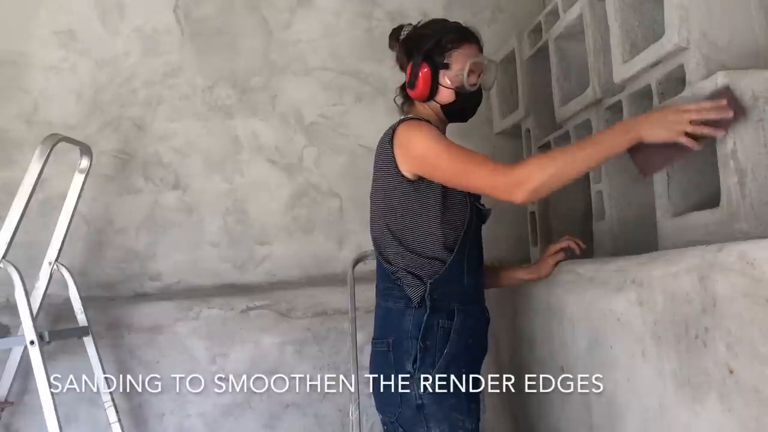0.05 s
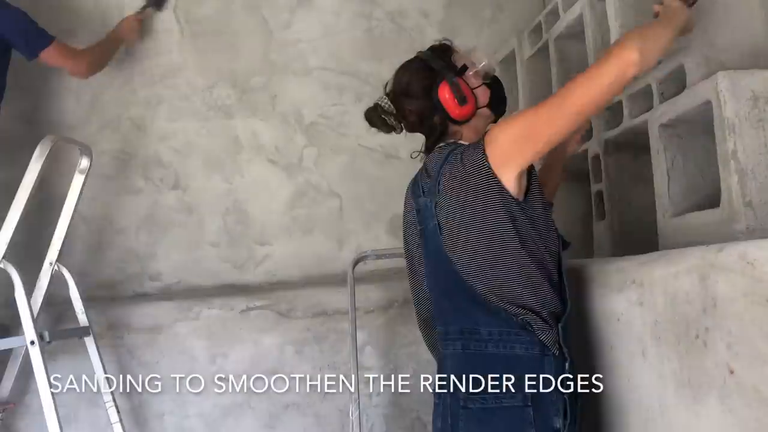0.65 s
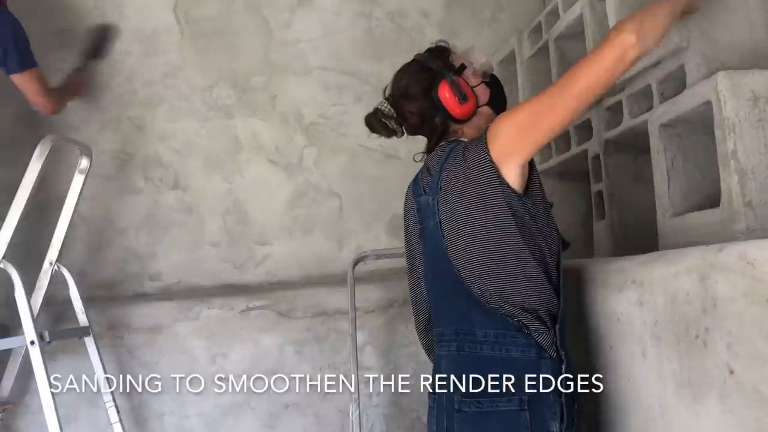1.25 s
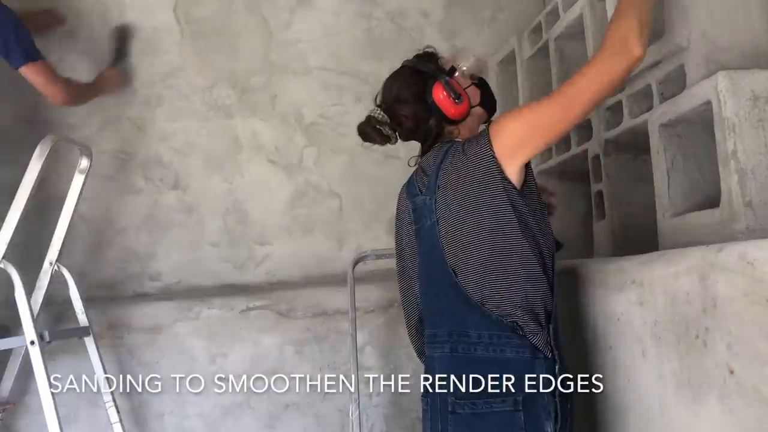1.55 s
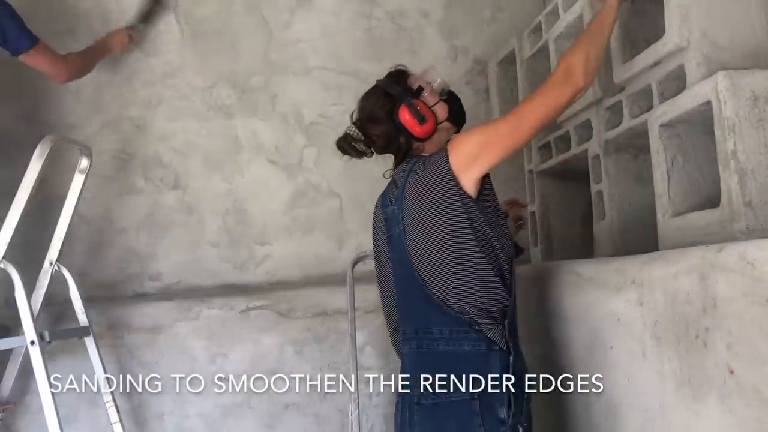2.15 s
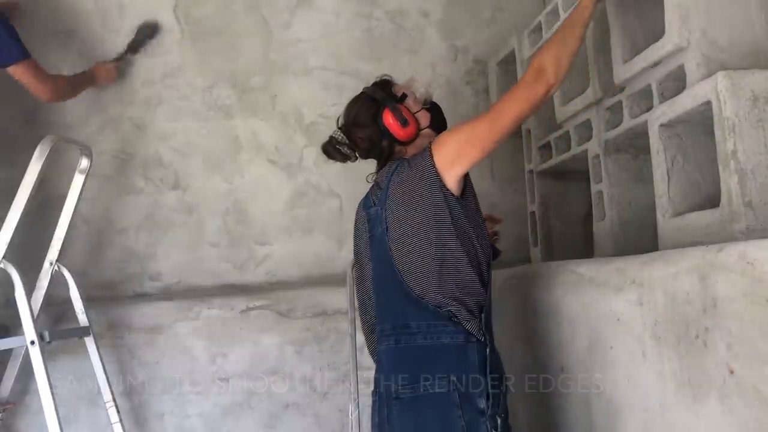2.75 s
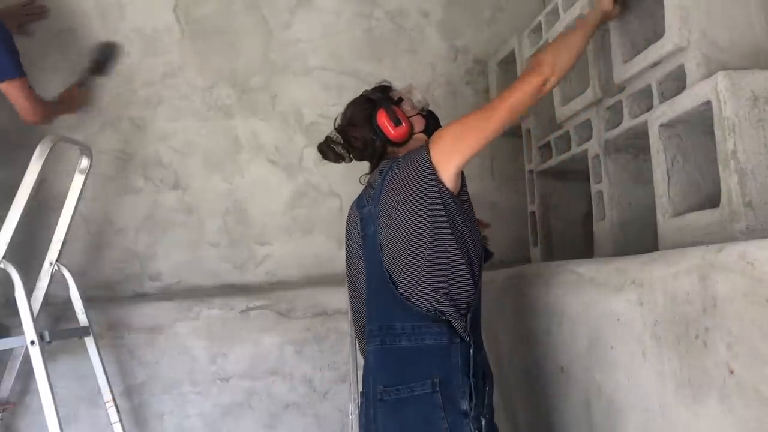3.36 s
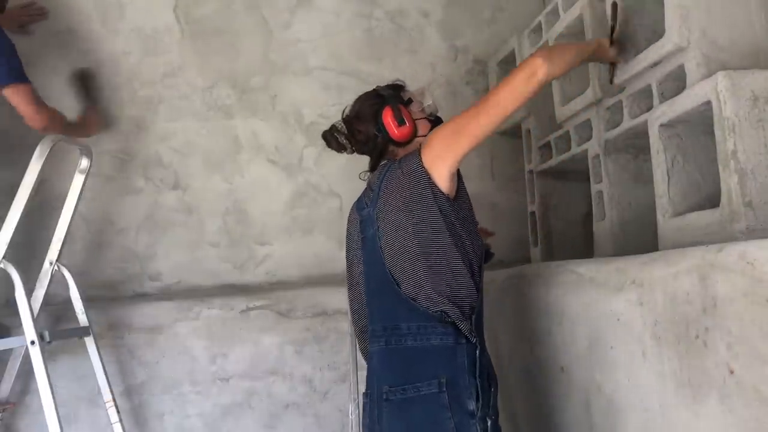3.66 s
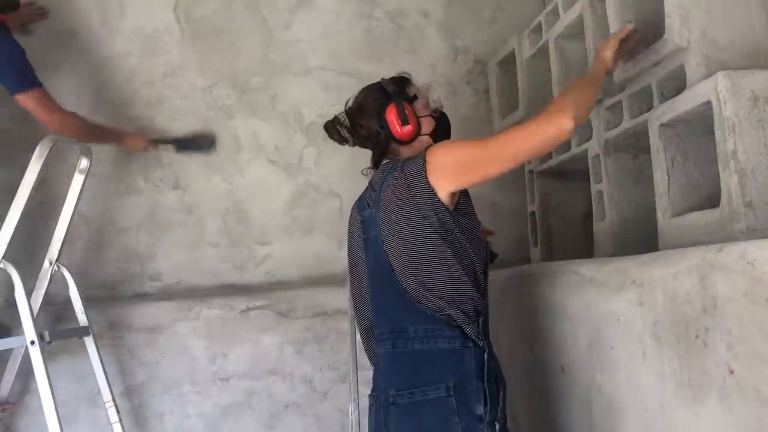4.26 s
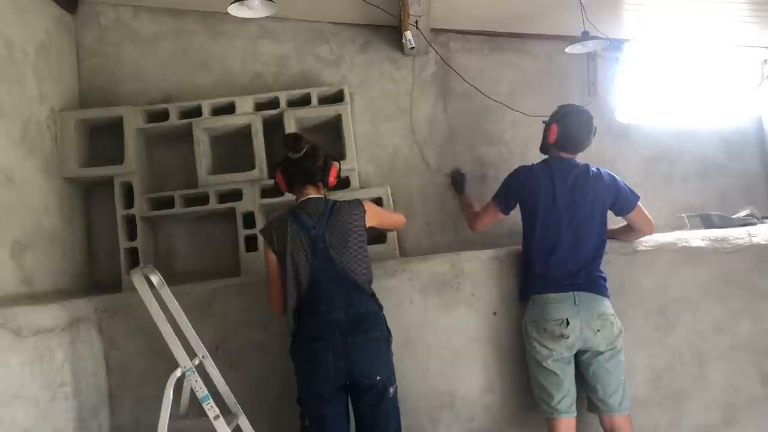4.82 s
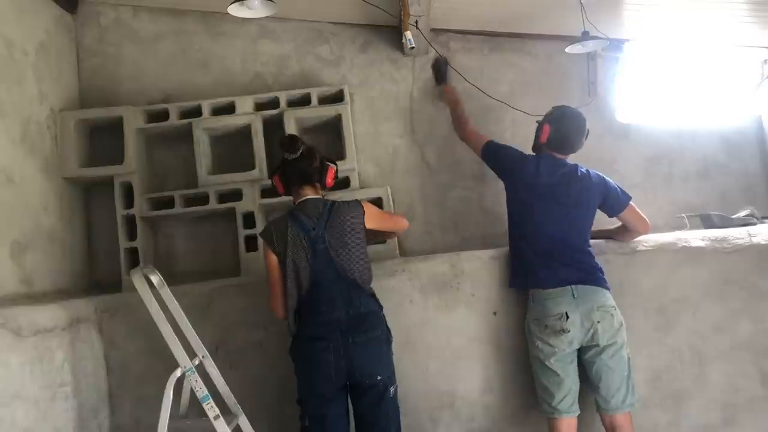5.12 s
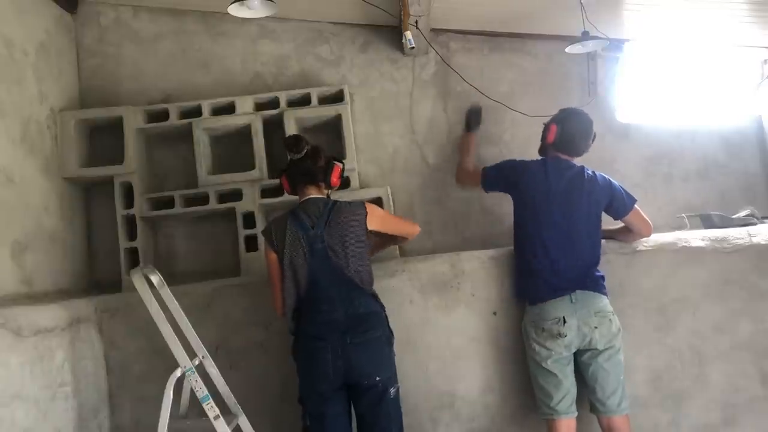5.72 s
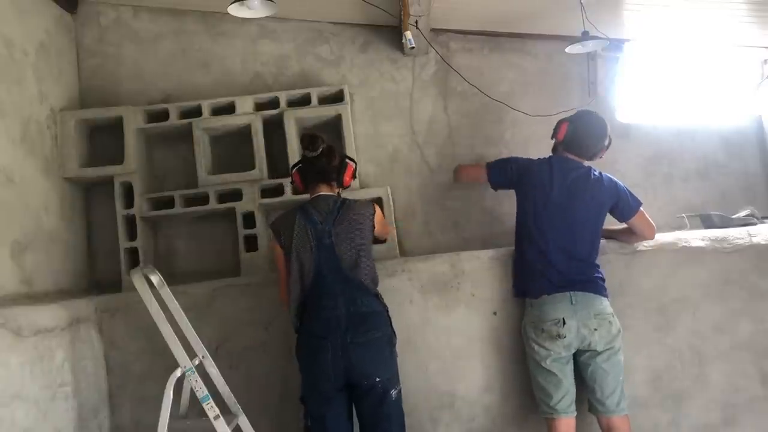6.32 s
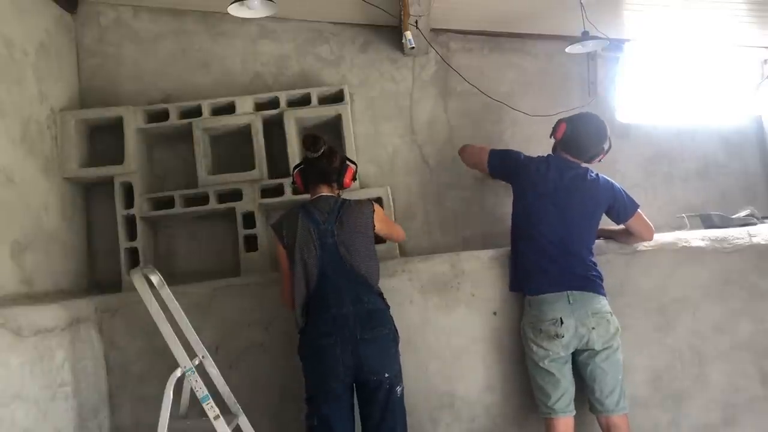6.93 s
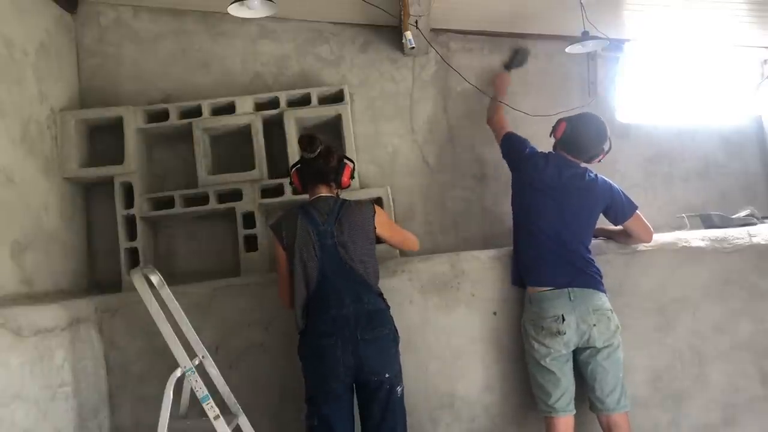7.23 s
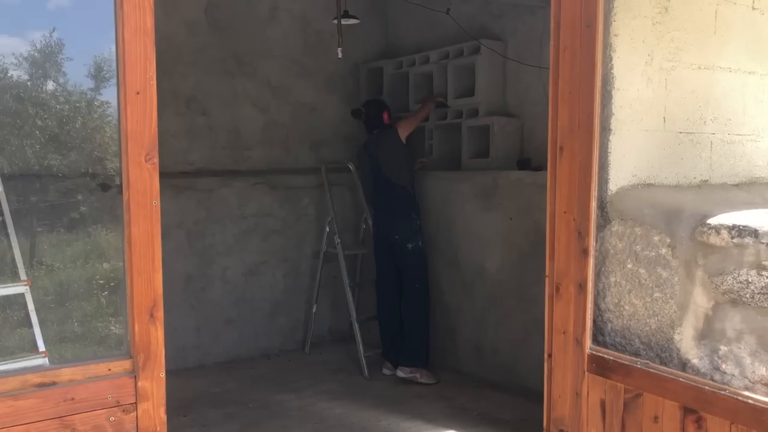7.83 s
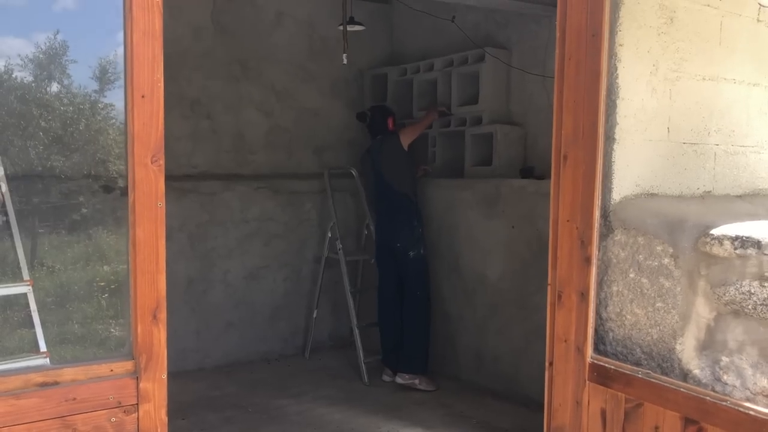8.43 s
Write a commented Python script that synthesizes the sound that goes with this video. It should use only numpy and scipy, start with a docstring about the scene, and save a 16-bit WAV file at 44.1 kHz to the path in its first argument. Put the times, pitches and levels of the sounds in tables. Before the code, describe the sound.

A sanding block rasps back and forth over hollow concrete blocks and cement, with short pauses and a slight room echo.

```python
"""Hand sanding of hollow concrete blocks and fresh render in a bare cement room. Each stroke speeds up and
slows down; grit catches on the rough face, rings the sanding block and makes the hollow wall drone. Open
cavities sing short notes, and the sanding block taps the wall. The echoing work is heard from one spot after
another over still air, the scene changing abruptly each time: at arm's length, from behind two workers, then
louder from the doorway."""
import sys
import numpy as np
from scipy import signal
from scipy.fft import rfft, irfft, next_fast_len
from scipy.io import wavfile
from scipy.ndimage import uniform_filter1d, map_coordinates

SR = 44100
rng = np.random.default_rng(int(sys.argv[2]) if len(sys.argv) > 2 else 0)


def transcribe(signal):
    """Save signal, clipped to [-1, 1], as a 16-bit WAV file at the path in sys.argv[1]."""
    frames = np.atleast_2d(signal).T
    limited = np.clip(frames, -1, 1)
    pcm = np.round(limited * 32767).astype(np.int16)
    wavfile.write(sys.argv[1], SR, pcm)


N = 378378


def amp(db):
    """Turn decibels into a gain."""
    return 10 ** (np.asarray(db) / 20)


def unit(x):
    """Scale a sound to an average (rms) level of 1."""
    return x / np.sqrt(np.mean(x ** 2) + 1e-20)


def along(points, hz):
    """Read between (frequency, value) points on a log frequency axis."""
    f, values = np.transpose(points)
    return np.interp(np.log(hz + 1), np.log(f + 1), values)


def wobble(rate):
    """A smooth curve through `rate` random values a second."""
    return map_coordinates(rng.standard_normal(int(N * rate / SR) + 4), [np.arange(N) * rate / SR])


def filtered(x, response):
    """Multiply each frequency in x by response(frequency)."""
    size = next_fast_len(len(x) + SR // 2)
    return irfft(rfft(x, size) * response(np.fft.rfftfreq(size, 1 / SR)), size)[:len(x)]


def resonances(modes, f):
    """How something that rings answers at f; modes are (pitch [Hz], width [Hz], level [dB])."""
    return sum((-1) ** k * amp(db) * 1j * f * width / (hz * hz - f * f + 1j * f * width)
               for k, (hz, width, db) in enumerate(modes))


def grit(grains_per_s, bump_db, spread_db=2, dust_db=1):
    """Sand grains of all sizes snap off over a hiss of dust, in clumps where the wall is bumpy."""
    grains = (rng.random(N) < grains_per_s / SR) * rng.standard_normal(N)
    grains *= amp(spread_db * np.minimum(rng.exponential(size=N), 4))
    bumps = amp(bump_db * (wobble(45) + wobble(260)))
    dust = amp(dust_db) * rng.standard_normal(N)
    return unit(bumps * (unit(grains) + dust))


# Tone colour of the scrape from each listening spot: (frequency [Hz], level [dB])
CLOSE = [(40, -50), (150, -51), (380, -20), (560, -8.5), (850, -4.5), (1000, -6), (1220, -4), (1550, -4),
         (2000, -0.5), (3300, 1), (5500, 1), (8000, 0), (12000, -5), (15700, -6.5)]
BEHIND = [(40, -48), (120, -18), (200, -10), (350, -28), (480, -5), (790, -2.5), (950, -1.5), (1350, -1),
          (3200, 2.5), (3800, 2), (6400, 1), (8000, -0.5), (12000, -5), (15700, -6)]
DOORWAY = [(150, -26), (470, -8), (660, -2), (780, -5.5), (1000, -1.5), (1350, -4.5), (1850, 6), (2050, 8),
           (3400, 6.5), (4800, 6), (7000, 3.5), (10000, -1), (15700, -5.5)]


def scrape(sand, colour, hiss_db, rasp_db, rings, patchy_db=1.42):
    """Grit rings the sanding block; light strokes hiss, while edges and lumps rasp."""
    coloured = filtered(sand, lambda f: amp(along(colour, f)))
    hz, age, spectrum = signal.stft(coloured, SR, nperseg=512)
    f = hz[:, None]
    for centre, width, db in rings:
        spectrum = spectrum * (1 + (amp(db) - 1) * resonances([(centre, width, 0)], f))
    level = np.std(signal.istft(spectrum, nperseg=512)[1])
    hiss_now_db = np.interp(age, np.arange(len(sand)) / SR, hiss_db)
    treble_db = hiss_now_db * along([(2800, 0.077), (5000, 0.56), (10000, 1.13), (15500, 1.2)], f)
    low_db = rasp_db * along([(1300, 0.93), (2200, 0.011)], f)
    # the colour shifts from patch to patch of wall
    patches = uniform_filter1d(rng.standard_normal(spectrum.shape), size=4, axis=0)
    patches = unit(uniform_filter1d(patches, size=5, axis=1))
    spectrum = spectrum * amp(treble_db + low_db + patchy_db * patches) / level
    return signal.istft(spectrum, nperseg=512)[1][:len(sand)]


# Ringing of the air inside the hollow wall: (pitch [Hz], width [Hz], level [dB])
CELLS = [(70, 20, -27), (171, 22, -8.5), (280.5, 34, 0), (416, 74, -5)]
DEEP_CELLS = [(59.4, 41, -8), (237, 38, 0.5), (352, 60, -6.5)]


def wall_drone(judder, cavities, low_cut_hz=33):
    """The juddering sanding block shakes the air in the hollow wall."""
    return unit(filtered(judder, lambda f: resonances(cavities, f) * f ** 4 / (f ** 4 + low_cut_hz ** 4)))


# One pass of the hand per row: (start [s], speeding up [s], slowing down [s], scrape level [dB],
# extra hiss [dB], extra rasp [dB], drone level [dB], block pitch [Hz], extra ring from a loose grip [dB])
STROKES = [(-0.045, 0.028, .11, -35.5, -2, 4.5, -54, 2390, 0),
           (0.077, 0.059, .16, -32, -1.5, 1, -57, 2490, 2),
           (0.269, .085, .15, -37, -2.5, 4, -60, 2400, 1.5),
           (0.64, 0.044, .09, -56.5, 4, 10.5, -65, 2350, -3),
           (0.715, .02, 0.073, -47, 4.5, -6, -77, 2400, -5),
           (0.762, 0.017, 0.13, -37, 6, -6, -69, 2400, -1.5),
           (0.77, .12, 0.095, -32.5, 4, 3, -55.5, 2350, 0), (0.972, 0.073, .18, -31, 1.5, 2, -56, 2420, -2),
           (1.194, .13, 0.17, -31, 1.5, 3.5, -58, 2350, -1.5),
           (1.465, 0.13, 0.26, -57, 3, 8, -65.5, 2430, 0),
           (1.75, .045, 0.062, -40.5, 6, -8, -78, 2270, 0.5),
           (1.786, 0.096, 0.19, -34, -1, 1, -55, 2270, -1.5),
           (2.036, 0.13, .1, -31, -2.5, 1, -55, 2310, -2), (2.245, 0.14, .12, -34, 1.5, 0, -53.5, 2290, -1),
           (2.481, 0.074, 0.14, -34.5, -1, 1, -59, 2280, -1.5),
           (2.661, 0.12, 0.25, -35.5, 0, 2.5, -58, 2310, 1),
           (2.965, 0.16, 0.093, -36, 3.5, -1.5, -61, 2280, 0.5),
           (3.23, .1, .149, -35, 2.5, 2.5, -61.5, 2370, 0.5),
           (3.452, 0.12, .13, -36, 5, 0.5, -61.5, 2200, -2.5),
           (3.688, 0.047, 0.094, -38.5, -0.5, 2, -63, 2250, -0.5),
           (3.8, .1, 0.14, -39.5, 3, 3, -66, 2400, 1), (3.94, .095, 0.18, -29.5, 0, -6.5, -62.5, 2440, 0.5),
           (4.3, 0.15, .03, -63, 8, 1, -74, 2390, 0), (4.512, .11, .06, -35.5, 2.5, 3.5, -60, 2320, -1),
           (4.68, .088, 0.062, -30, -2.5, -1, -57, 2450, 2),
           (4.818, 0.057, 0.094, -34.5, 1, 1.5, -67, 2360, 1),
           (4.935, 0.046, 0.15, -35.5, 2, 0.5, -54.5, 2550, -0.5),
           (5.13, .1, 0.095, -54, -6, 12, -70, 2600, 4), (5.27, 0.023, .06, -38.5, -6, -8, -72, 2400, 6),
           (5.272, 0.086, 0.14, -36, 2, 3.5, -64, 2250, -1),
           (5.66, 0.096, 0.095, -32, 0.5, 2, -55.5, 2630, 2.5),
           (5.88, 0.072, 0.13, -59, -5, -3, -68.5, 2600, 7),
           (5.95, .16, 0.18, -70.5, 11, 14.5, -84, 2310, 0), (6.106, 0.12, .075, -70, 16, 2, -84, 2590, -2),
           (6.3, 0.066, 0.15, -55.5, 2, 9, -66.5, 2170, 0.5), (6.421, .13, .051, -62, 14, 3, -86, 2300, 3),
           (6.568, .028, 0.051, -39, -2, 5, -65, 2560, 1.5),
           (6.609, .068, 0.1, -33, -3, -1.5, -57, 2650, 1.5), (6.705, .04, 0.2, -38, 5, 2, -57, 2400, 0),
           (6.89, .11, .18, -59.5, 7, 6, -69, 2230, 2),
           (7.086, 0.033, 0.098, -50.5, 4, -0.5, -69, 2180, -0.5),
           (7.192, .22, 0.22, -64.5, 10.5, 6, -80, 2250, 2),
           (7.538, .12, 0.094, -61.5, 12, 20, -68, 2540, 10),
           (7.655, 0.011, 0.058, -41, -4, 11.5, -44.5, 2310, -6),
           (7.718, 0.029, 0.07, -27.5, 1, 4, -47, 2700, -1),
           (7.777, 0.061, 0.066, -24, -.5, 2, -44.5, 2600, 0),
           (7.892, 0.08, 0.105, -22.5, .5, 0, -43, 2400, 0),
           (8.044, 0.084, 0.12, -24.5, 1.5, 2, -44.5, 2510, 2),
           (8.214, 0.041, 0.052, -22, 3, -2, -55, 2590, 0),
           (8.252, 0.059, .065, -20.5, 0, 2.5, -41, 2270, 2.5),
           (8.365, 0.068, .09, -25.5, 2.5, 3.5, -45, 2480, 1),
           (8.497, 0.094, .08, -21.5, -1, 2, -40.5, 2180, -1)]


def sanding(t, span, sand, wall, colour, ring_db, width_hz, upper_hz, upper_db, upper_width_hz=380):
    """The hand speeds up and slows down on each stroke; its speed sets the scrape, hiss and drone."""
    slow_dull_db, bite_db = 3, 1.5  # less hiss as the hand slows, more where the stroke bites in
    scrape_power, drone_power = 1.28, 0.69  # how steeply each grows with speed
    out = np.zeros(len(t))
    for start, rise, fall, scrape_db, hiss_db, rasp_db, wall_db, ring_hz, loose_db in STROKES:
        if not span[0] <= start + (rise + fall) / 2 < span[1]:
            continue
        on = (t > start) & (t < start + rise + fall)
        travel = np.interp(t[on], [start, start + rise, start + rise + fall], [0, .5, 1])
        speed = np.abs(np.sin(np.pi * travel))
        bright_db = hiss_db - slow_dull_db * (1 - speed) + bite_db * (1 - 2 * travel)
        rings = [(ring_hz, width_hz, ring_db + loose_db), (upper_hz, upper_width_hz, upper_db)]
        scraping = scrape(sand[on], colour, bright_db, rasp_db, rings)
        out[on] += amp(scrape_db) * speed ** scrape_power * scraping
        out[on] += amp(wall_db) * speed ** drone_power * wall[on]
    return out


# How long the room rings: (frequency [Hz], time to fade by 60 dB [s])
ECHO_TIMES = [(200, 1), (1000, 0.64), (2500, 0.62), (5000, 0.55), (10000, 0.4), (16000, 0.3)]


def room_echo(x, echo_db, treble_db=-5.0, patterns=16, renew_s=.045):
    """Bare walls echo, the treble dying first; the pattern changes as the hand moves along the wall."""
    hz, age, noise = signal.stft(rng.standard_normal((patterns, SR // 2)), SR, nperseg=256)
    decay = amp(-60 * age / along(ECHO_TIMES, hz)[:, None])
    decay /= np.linalg.norm(decay, axis=1, keepdims=True)
    decay *= amp(along([(2500, 0), (10000, treble_db)], hz))[:, None]
    tails = signal.istft(noise * decay, nperseg=256)[1] / np.sqrt(128)
    echoes, t = np.zeros(len(x) + SR), np.arange(len(x)) / SR
    for k, centre in enumerate(np.arange(0, t[-1], renew_s)):
        first, last = np.searchsorted(t, [centre - renew_s, centre + renew_s])
        piece = x[first:last] * np.cos(np.pi / 2 * (t[first:last] - centre) / renew_s)
        echo = signal.fftconvolve(piece, tails[k % patterns])
        echoes[first + SR // 250:][:len(echo)] += echo  # arrives 4 ms later
    share = amp(echo_db + 3.5)
    return (x + share * echoes[:len(x)]) / np.sqrt(1 + share ** 2)


# Tone colour of the still air: (frequency [Hz], relative level [dB])
AIR_COLOUR = [(20, -32), (35, -12), (55, 2), (100, -0.5), (350, -3.5), (1000, -8), (2500, -5), (7000, -10),
              (15700, -6.5)]


def still_air(level_db=-67):
    """The air in the room makes a faint, steady hush."""
    return amp(level_db) * unit(filtered(rng.standard_normal(N), lambda f: amp(along(AIR_COLOUR, f))))


# Notes from open cavities: (loudest moment [s], half length [s], pitch [Hz], level [dB])
CAVITY_NOTES = [(0.146, 0.089, 397, -51.5), (0.85, 0.13, 857, -54), (1.15, 0.23, 477, -57),
                (1.934, .1, 880, -52.5), (2.03, .17, 270, -55.5), (3.369, 0.068, 1210, -51),
                (3.578, 0.096, 1210, -58), (5.019, .12, 272, -58), (5.749, .11, 757, -51.5),
                (5.778, .11, 541, -50), (6.608, .06, 1010, -56), (7.855, 0.21, 662, -49),
                (8.147, .15, 666, -44.5), (8.351, .19, 645, -41)]


def cavity_notes(width_hz=80):
    """Rubbing across the mouth of an open cavity draws a short hollow note from it."""
    out, t = np.zeros(N), np.arange(N) / SR
    for middle, half_length, hz, db in CAVITY_NOTES:
        near = np.abs(t - middle) < half_length
        b, a = signal.iirpeak(hz, hz / width_hz, SR)
        note = signal.lfilter(b, a, signal.lfilter(b, a, rng.standard_normal(SR)))[-near.sum():]
        swell = np.cos(np.pi / 2 * (t[near] - middle) / half_length) ** 2
        out[near] += amp(db) * unit(note) * swell
    return out


# The sanding block touches the wall: (time [s], relative crunch [dB], ring pitch [Hz], ring level [dB])
TAPS = [(0.652, -38.5, 2350, -45), (0.765, -38, 2420, -51), (0.771, -27, 2380, -50),
        (1.735, -46, 2400, -55), (1.757, -32, 2420, -53), (1.769, -41, 2350, -52), (4.411, -40, 3380, -47),
        (4.413, -44, 4720, -45), (6.294, -48.5, 4460, -47), (6.347, -50, 2250, -44),
        (6.587, -35, 2600, -46), (7.663, -49, 2420, -49), (7.727, -26, 2450, -42)]


def taps(crunch_fade_s=0.044, ring_fade_s=0.042):
    """Each touch makes a short crunch and rings the sanding block or a loose chip."""
    crunches, rings, t = np.zeros(N + SR), np.zeros(N + SR), np.arange(SR // 10) / SR
    for start, crunch_db, hz, ring_db in TAPS:
        at = round(start * SR)
        crunches[at:][:len(t)] += amp(crunch_db - 7 - 60 * t / crunch_fade_s) * rng.standard_normal(len(t))
        rings[at:][:len(t)] += amp(ring_db - 60 * t / ring_fade_s) * np.sin(2 * np.pi * hz * t)
    thin = lambda f: 1j * f / (500 + 1j * f)  # so small a contact gives off little bass
    block_modes = [(2400, 330, -9), (4400, 900, -19)]
    return rings[:N] + filtered(crunches[:N], lambda f: thin(f) + resonances(block_modes, f))


# Scenes, each heard from its own spot: (start [s], end [s])
SCENE_TIMES = [(0, .632), (.651, 4.434), (4.44, 7.665), (7.659, 8.62)]
# How each scene sounds: (scrape colour [table], cavities [table], block ring boost [dB], ring width [Hz], #
# upper ring pitch [Hz], upper ring boost [dB], relative echo [dB])
SCENE_SOUNDS = [(CLOSE, CELLS, 13.2, 170, 4450, 4.8, -4.4), (CLOSE, CELLS, 11.4, 230, 4240, 4.5, 0),
                (BEHIND, CELLS, 9.4, 304, 4360, 4.5, 1), (DOORWAY, DEEP_CELLS, 2.7, 370, 4600, 2.1, -1.5)]


def scene(fade_in_s=.001, fade_out_s=.012):
    """Each scene of sanding, heard from its own spot, fills the room with echo; the scene changes abruptly from
    one to the next, over still air."""
    t = np.arange(N) / SR
    taps_and_notes = taps() + cavity_notes()
    pressure = amp(0.5 * wobble(rate=28))  # the hand presses unevenly
    sand = pressure * grit(grains_per_s=6000, bump_db=1.08)
    judder = pressure * grit(grains_per_s=900, bump_db=2.0)
    out = still_air()
    for (start, end), (colour, cavities, *block_rings, echo_db) in zip(SCENE_TIMES, SCENE_SOUNDS):
        now = (t >= start) & (t < end)
        wall = wall_drone(judder[now], cavities)
        strokes = sanding(t[now], (start, end), sand[now], wall, colour, *block_rings)
        fade_in = np.minimum((t[now] - start) / fade_in_s, 1)
        fade_out = np.minimum((end - t[now]) / fade_out_s, 1) ** 2
        out[now] += fade_in * fade_out * room_echo(strokes + taps_and_notes[now], echo_db)
    return out[None]


def record(dry, top_hz=15800):
    """The microphone keeps nothing above its highest frequency."""
    return filtered(dry[0], lambda hz: hz < top_hz)[None]


dry = scene()
out = record(dry)
transcribe(out)
```